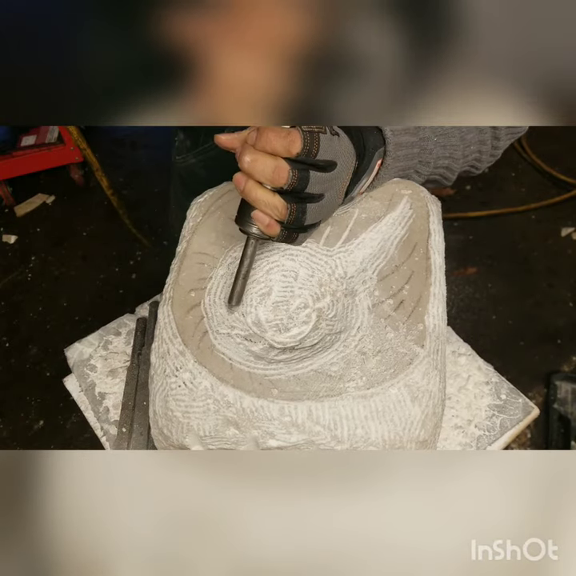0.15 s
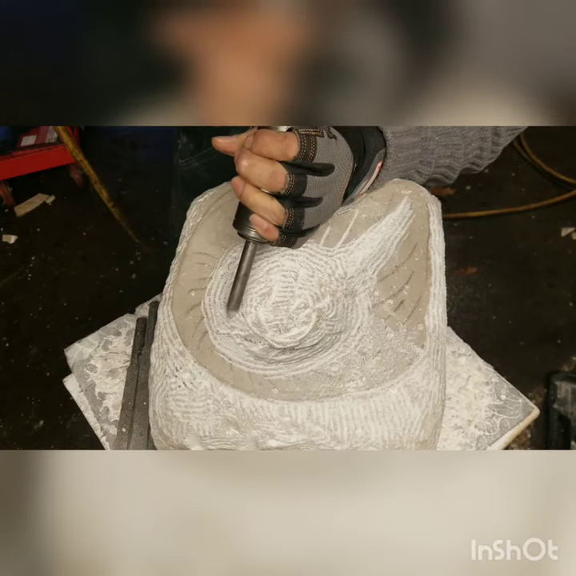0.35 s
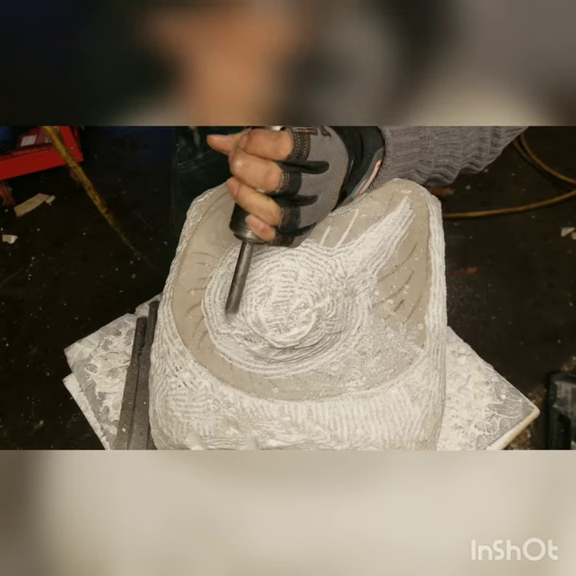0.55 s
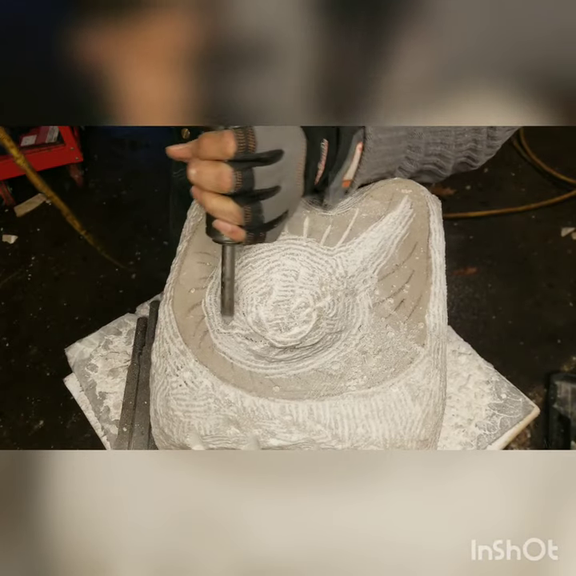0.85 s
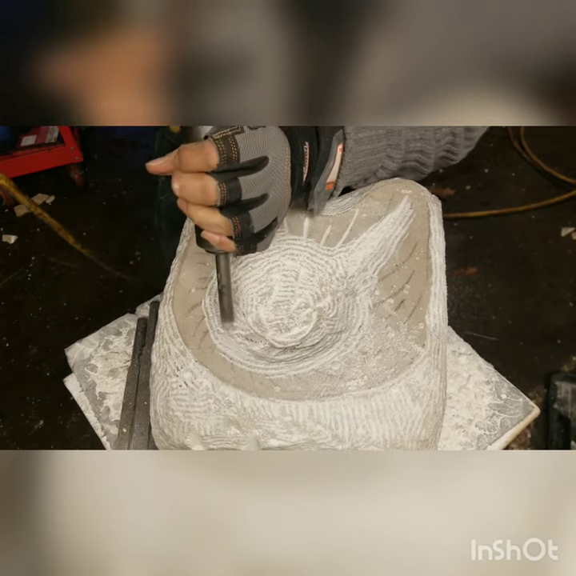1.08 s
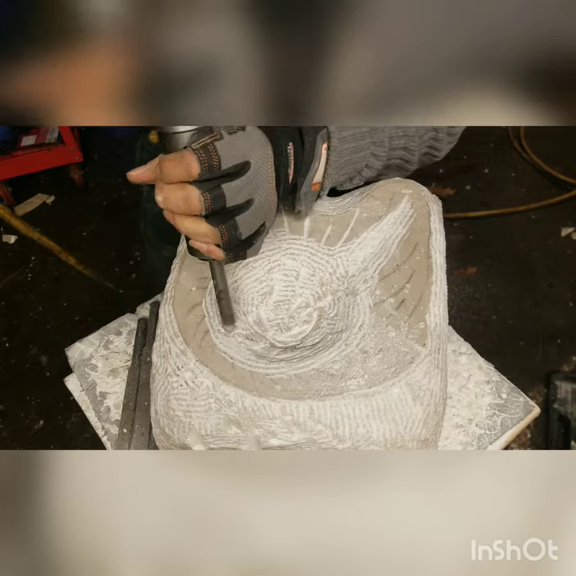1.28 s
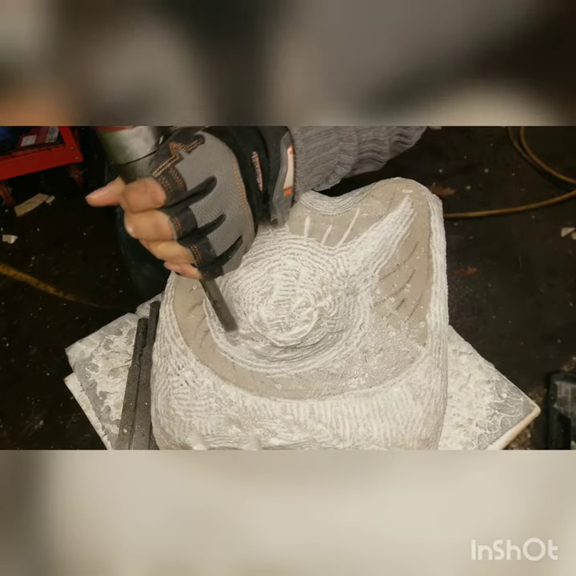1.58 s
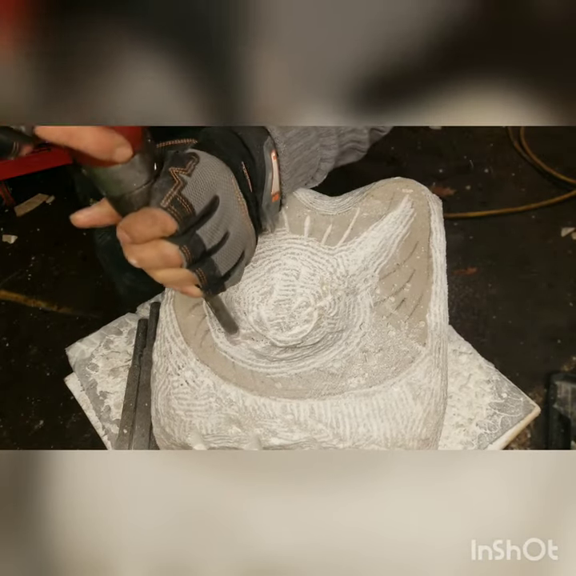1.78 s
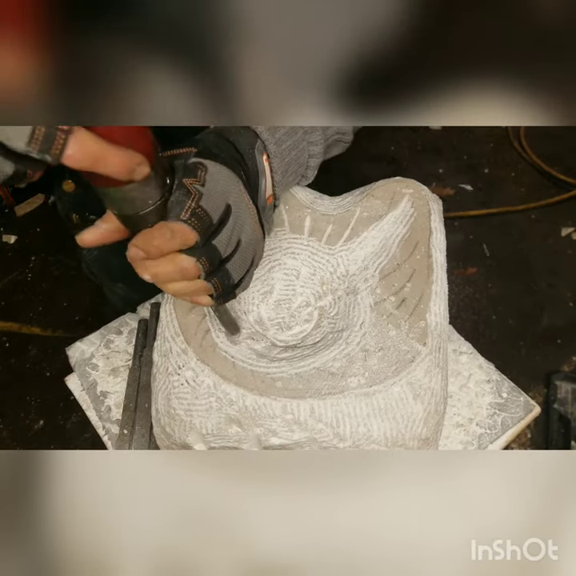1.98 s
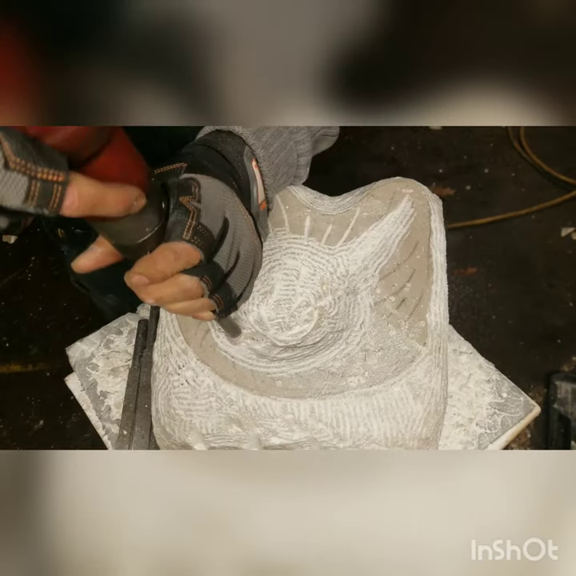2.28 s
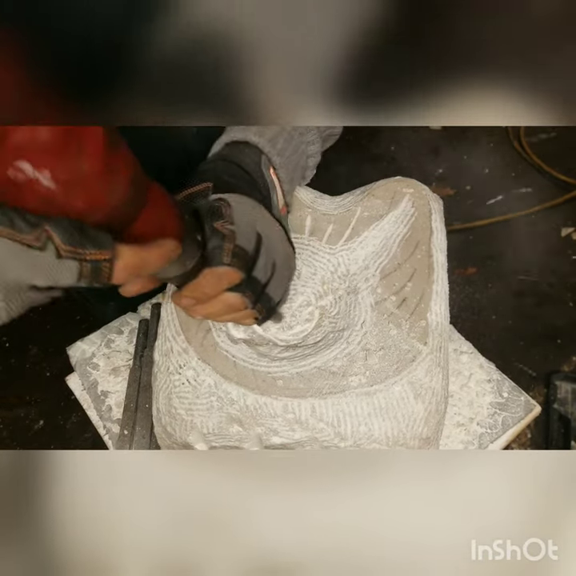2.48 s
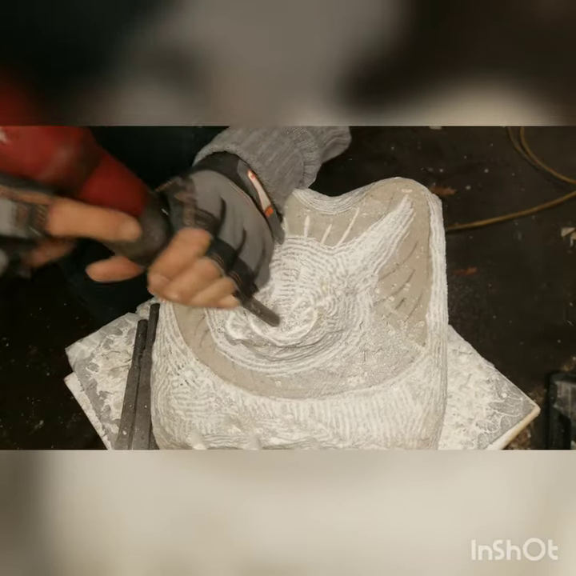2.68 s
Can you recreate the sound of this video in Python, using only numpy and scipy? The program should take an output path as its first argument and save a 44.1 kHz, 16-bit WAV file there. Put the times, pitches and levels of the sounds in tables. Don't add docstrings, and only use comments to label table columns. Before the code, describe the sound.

Pneumatic hammer chisels stone in rapid sharp metallic bursts with hissing air, close up

```python
import sys
import numpy as np
from scipy import signal
from scipy.fft import rfft, irfft, next_fast_len
from scipy.io import wavfile
from scipy.ndimage import uniform_filter1d, minimum_filter1d

SR = 44100
rng = np.random.default_rng(int(sys.argv[2]) if len(sys.argv) > 2 else 0)


def voltage_ratio(level):
    return 10 ** (np.asarray(level, float) / 20)


def inscribe(sig):
    pcm = np.round(np.clip(np.atleast_2d(sig).T, -1, 1) * 32767)
    wavfile.write(sys.argv[1], SR, pcm.astype(np.int16))


N = 125685


def unit(x):
    return x / np.sqrt(np.mean(x ** 2) + 1e-20)


def along(points, hz):
    f, v = np.transpose(points)
    return np.interp(np.log(hz + 1), np.log(f + 1), v)


def at(points, s):
    return np.interp(s, *np.transpose(points))


def filtered(x, response):
    m = next_fast_len(N + SR // 2)
    return irfft(rfft(x, m) * response(np.fft.rfftfreq(m, 1 / SR)), m)[..., :N]


def peak(f, hz, width, db):
    return voltage_ratio(db) * 1j * f * width / (hz * hz - f * f + 1j * f * width)


def dying(t, after, t60, rise):
    u = np.maximum(t - after, 0)
    return voltage_ratio(-60 * u / t60) * (1 - np.exp(-u / rise))


def noise(spectrum):
    z = signal.stft(rng.standard_normal((2, N)), nperseg=256)[2]
    field = rng.standard_normal(z.shape[1:])
    field = uniform_filter1d(uniform_filter1d(field, 8, 0), 8, 1)
    patch_db = 2.5 * unit(field)
    pair = signal.istft(z * voltage_ratio(patch_db), nperseg=256)[1][:, :N]
    return unit(filtered(pair, lambda f: voltage_ratio(along(spectrum, f))))


# start_s, crack_db, ring_hz, stone_db, puff_db
SHORT_BURSTS = [(.2015, -58, 12000, -73, -48), (0.2132, -31, 12200, -40, -42.5),
                (0.2354, -42, 11380, -67, -34.5), (0.2599, -15, 12220, -30, -35.5),
                (0.3018, -7, 13060, -28, -31), (0.3468, -12.5, 11220, -26.5, -31.5),
                (0.404, -19, 11530, -34.5, -40), (0.4748, -22, 11100, -38, -37.5),
                (0.5228, -6, 12070, -30.5, -33), (0.5696, -8.5, 10980, -29.5, -36),
                (0.6063, -12.5, 11730, -30, -32.5), (0.6485, -12.5, 11600, -33.5, -38),
                (0.6901, -14, 11100, -27.5, -33.5), (0.7344, -14.5, 11920, -32.5, -39),
                (0.768, -23, 12400, -38, -45.5), (0.881, -19.5, 11960, -50, -44.5)]
# start_s, crack_db, ring_hz, stone_db, puff_db
LONG_BURST = [(0.906, -12.5, 12100, -31.5, -31.5), (0.9459, -6, 11400, -32, -33),
              (0.983, -14, 11800, -28, -32.5), (1.0238, -13, 11700, -30, -34),
              (1.0653, -11, 11440, -31, -33.5), (1.1038, -11.5, 12180, -32, -31.5),
              (1.1398, -12, 11500, -29.5, -33.5), (1.18, -13, 10970, -26, -31.5),
              (1.2172, -16.5, 11370, -29, -33), (1.254, -9, 11100, -30, -31.5),
              (1.2893, -13, 11000, -30.5, -32), (1.3254, -15, 11050, -31.5, -33.5),
              (1.365, -12.5, 11280, -28, -32), (1.4007, -14, 11650, -29.5, -36.5),
              (1.4374, -10, 11480, -28.5, -32.5), (1.4798, -14.5, 10970, -29, -32),
              (1.5195, -9, 11210, -34.5, -34.5), (1.5594, -12, 10860, -27.5, -32.5),
              (1.5958, -13.5, 11040, -29.5, -31), (1.6315, -12, 12320, -30.5, -33),
              (1.6691, -17, 11540, -29.5, -33), (1.704, -10, 11700, -28.5, -32.5),
              (1.7456, -19, 12400, -27, -31.5), (1.7824, -17, 11440, -32, -31.5),
                (1.8186, -23, 11000, -33.5, -30.5), (1.8525, -22, 12600, -27, -30),
                (1.888, -18.5, 10960, -29.5, -31), (1.9217, -12.5, 12100, -28, -29.5),
                (1.9577, -29, 12100, -31.5, -30), (1.9923, -26, 10700, -31.5, -31),
                (2.0258, -15.5, 11100, -27.5, -28.5), (2.0601, -22, 10760, -33, -31.5),
                (2.096, -20, 10600, -33, -30.5), (2.131, -24, 11800, -32.5, -31),
                (2.1647, -24.5, 11000, -28, -29), (2.199, -19, 13100, -31.5, -32),
                (2.2326, -18.5, 12900, -30, -31), (2.2673, -18, 11200, -28.5, -31),
                (2.3017, -28, 12300, -28.5, -31), (2.335, -11.5, 11430, -25, -29),
                (2.3715, -6.5, 12240, -28, -35), (2.413, -13, 11700, -30.5, -33.5),
                (2.4564, -11, 13200, -28.5, -35.5), (2.4978, -11.5, 11860, -26.5, -32.5),
                (2.5392, -21, 11730, -30, -32)]


def strokes():
    return SHORT_BURSTS + LONG_BURST


# pitch_hz, level_db (per Hz)
HUM_COLOUR = [(25, 4), (80, 4), (357, -42), (430, -42), (1170, -28), (1400, -39), (4000, -36), (6000, -68)]


def hum():
    return voltage_ratio(-62.5) * noise(HUM_COLOUR)


# pitch_hz, t60_s
ROOM_DECAY = [(150, 0.35), (4000, 0.32), (15000, 0.26)]


def room(x):
    out, step, delay = np.zeros((2, N + 2 * SR)), SR // 5, 200
    for k in range(0, N, step):
        hz, t, z = signal.stft(rng.standard_normal((2, SR // 3)), SR, nperseg=256)
        decay = voltage_ratio(-60 * t / along(ROOM_DECAY, hz)[:, None])
        tail = signal.istft(z * decay, SR, nperseg=256)[1]
        tail = tail / np.linalg.norm(tail[0])
        wet = signal.fftconvolve(x[None, k:k + step], tail, axes=1)
        out[:, k + delay:][:, :wet.shape[1]] += wet
    return out[:, :N]


# start_s, peak_db, pitch_hz, width_hz
TICK_EVENTS = [
    (0.1135, -53.5, 3900, 1490),
    (2.7218, -46.5, 12200, 2540),
    (2.748, -51, 10750, 900),
    (2.7681, -34.5, 10800, 398),
]


def ticks():
    out, t = np.zeros((2, N)), np.arange(N) / SR
    for s, db, hz, width in TICK_EVENTS:
        burst = voltage_ratio(db) * dying(t, s, 0.01, 0.00063) * rng.standard_normal((2, N))
        narrow = np.sqrt(SR / 4 / width)
        out += filtered(burst, lambda f: voltage_ratio(1) + peak(f, hz, width, 0) * narrow)
    return out


# start_s, rise_s, hold_s, level_db
JET_FLOW = [
    (.182, 0.011, 0.004, -44),
    (.208, .01, 0.021, -43),
    (.25, 0.016, 0.062, -26.5),
    (.46, 0.021, 0.03, -32.5),
    (.52, 0.011, 0.21, -29),
    (.845, 0.03, 0.0047, -33),
    (.91, 0.052, 0.7, -34),
    (1.74, 0.027, 0.79, -31.5),
]
# pitch_hz, level_db (per Hz)
JET_COLOUR = [(2500, -19), (4000, -14.5), (6000, -6), (9900, -10.5), (10800, -2), (14200, -1.5),
              (15500, -0.5)]
# start_s, rise_s, hold_s, level_db
LEAK_FLOW = [
    (2.735, 0.035, 0.04, -52),
    (2.78, 0.039, 0.018, -50.5),
]
# pitch_hz, level_db (per Hz)
LEAK_COLOUR = [(120, -27), (300, -6.5), (1500, -6), (5000, 0.5), (9000, -7.5), (12500, -5), (16000, -10)]
# start_s, rise_s, hold_s, level_db
SEEP_FLOW = [
    (.116, .004, .05, -74),
]
# pitch_hz, level_db (per Hz)
SEEP_COLOUR = [(600, -45), (2200, -6), (2900, -17), (4000, 3), (6500, -16), (12700, -13), (16000, -10)]


def flow(rows):
    t, t60 = np.arange(N) / SR, 0.094
    total = np.zeros(N)
    for s, rise, hold, db in rows:
        fall_db = 60 * np.maximum(t - s - rise - hold, 0) / t60
        total += voltage_ratio(db - fall_db) * np.clip((t - s) / rise, 0, 1) ** 0.61
    return total


def air():
    shut, shut_s, shut_wide_s, shut_db = np.zeros(N), 0.0032, 0.0024, -14
    for s, crack_db, *_ in strokes():
        shut[round((s - shut_s) * SR)] = crack_db > -18.2
    bell = np.arange(-800, 801) / SR
    shut = signal.fftconvolve(shut, np.exp(-(bell / shut_wide_s) ** 2), 'same')
    flutter_db = 2 * unit(uniform_filter1d(rng.standard_normal(N), 300))
    jet = noise(JET_COLOUR) + 0.18 * noise(STONE_COLOUR)
    out = flow(JET_FLOW) * voltage_ratio(shut_db * shut) * jet
    out += flow(LEAK_FLOW) * noise(LEAK_COLOUR)
    out += flow(SEEP_FLOW) * noise(SEEP_COLOUR)
    return voltage_ratio(flutter_db) * out


# start_s, level_db, pitch_hz, t60_s
BLOCK_NOTES = [
    (.815, -48, 890, 0.045),
    (1.1045, -27.5, 1027, 0.03),
    (1.1805, -29, 652, 0.043),
    (1.181, -28, 2004, 0.026),
    (2.172, -33, 747, .05),
    (2.335, -29, 1505, 0.034),
    (2.4985, -26.5, 1007, 0.039),
    (2.499, -27.5, 6595, .08),
    (2.785, -58, 530, 0.13),
]


def knocks():
    t, notes = np.arange(N) / SR, np.zeros((2, N))
    for s, db, hz, t60 in BLOCK_NOTES:
        pair_hz = hz * np.array([[.97], [1.04]])
        notes += voltage_ratio(db) * dying(t, s, t60, 0.0018) * np.sin(2 * np.pi * pair_hz * (t - s))
    return np.array([notes[0] + notes[1], notes[0] - notes[1]])


# after_s, push_or_suck, level_db
VALVE_PUFFS = [
    (-.0017, 0.49, -0.5),
    (.0007, -0.89, 1.5),
    (.0029, 0.98, -5.5),
    (.0104, 1, -1),
    (.0162, 1, 1.5),
]
# pitch_hz, width_hz, level_db
PORT_MODES = [(54.8, 55, -11.5), (94, 44.5, 7), (162.6, 22, -3), (286, 100, -1.5), (328.5, 160, -3),
              (769.8, 130, 0.5)]
# time_s, level_db
ROOM_COUPLING = [(.2, 0), (.45, 3), (.75, 4), (1, 3), (1.4, 5), (1.8, 0.5), (2.15, -1), (2.3, 0),
                 (2.54, 6.5)]
# time_s, level_db
TOOL_WEIGHT = [(.2, 0.5), (.47, -11), (.53, 15), (.76, 12), (.9, -5), (1.4, -12), (2.2, 6), (2.55, -12)]


def exhaust():
    puff_s, last_return_db = 0.00088, -7.5
    pulses, blows, thumps = np.zeros((2, N)), np.zeros(N), np.zeros(N)
    times = [row[0] for row in strokes()]
    for (s, *_, db), gap in zip(strokes(), np.diff(times, append=N)):
        blows[round((s - .0017) * SR)] = voltage_ratio(db + at(ROOM_COUPLING, s))
        thumps[round((s - .001) * SR)] = voltage_ratio(db + at(TOOL_WEIGHT, s))
        jitter, scatter, side = rng.standard_normal((3, len(VALVE_PUFFS)))
        for i, (after, sign, level) in enumerate(VALVE_PUFFS):
            k = round((s + after + .00025 * jitter[i]) * SR)
            puff_db = db + level + 1.73 * scatter[i] + last_return_db * (i > 2 and gap > .055)
            pulses[:, k] += sign * voltage_ratio(puff_db) * np.array([1, side[i]])

    def port(f):
        return sum(peak(f, *mode) for mode in PORT_MODES) / (1 + (np.pi * f * puff_s) ** 2)

    def bench(f):
        return peak(f, 72.5, 70, -1.5) / (1 + (f / 200) ** 2)

    out = filtered(pulses, port)
    out += filtered(thumps, bench) * np.array([[1], [.6]])
    out += filtered(blows, lambda f: peak(f, 231, 5.8, 15.5)) * np.array([[1], [.3]])
    return voltage_ratio(41.5) * out


# after_s, level_db, t60_s
CONTACTS = [
    (0, -7.5, 0.0073),
    (.0008, 2.5, 0.01),
    (.004, -10.5, 0.045),
    (.013, -14, .06),
]
# pitch_hz, level_db (per Hz)
CRACK_COLOUR = [(3000, -113), (5500, -7.5), (9800, -6), (10900, -10), (14200, 0), (15500, -2)]
# pitch_hz, level_db (per Hz)
STONE_COLOUR = [(300, -9.5), (650, -1.5), (1700, -4.5), (4000, -4), (7000, -5), (11000, -10)]


def cracks():
    shape, t = np.zeros((2, N + SR)), np.arange(3072) / SR
    for s, crack_db, _, stone_db, _ in strokes():
        k = round((s - .001) * SR)
        scatter, delay = rng.standard_normal((2, len(CONTACTS)))
        for i, (after, level, t60) in enumerate(CONTACTS):
            hit_db = np.array([[crack_db], [stone_db + 23]])
            if i > 1:
                hit_db = hit_db * np.array([[.6], [.8]]) - 5
            if i != 1:
                hit_db = hit_db + 1.85 * scatter[i]
            envelope = dying(t, after * (1 + 0.24 * delay[i]), t60, 0.0012)
            shape[:, k:k + len(t)] += voltage_ratio(hit_db + level) * envelope
    grit = voltage_ratio(0.53 * unit(uniform_filter1d(rng.standard_normal((2, N)), 25)))
    steel = voltage_ratio(-3.5) * shape[0, :N] * unit(grit[0] * noise(CRACK_COLOUR))
    stone = voltage_ratio(-11.5) * shape[1, :N] * unit(grit[1] * noise(STONE_COLOUR))
    return steel + stone


# pitch_hz, level_db, t60_s
STEEL_MODES = [(4587, -21.5, 0.17), (11120, -9, 0.048), (6760, -30.5, 0.24)]
# time_s, level_db
GRIP_FREEDOM = [(.2, -8), (.9, -2), (1.15, 2), (1.5, -11), (1.8, -3), (2.1, 8), (2.35, -3.5), (2.55, -7)]


def chisel():
    ring_db, ring_t60, spread, scatter_db = 11.5, .011, .025, 3
    smear = .055
    ring, t = np.zeros((2, N + SR)), np.arange(3072) / SR
    for s, db, hz, *_ in strokes():
        k = round((s - .001) * SR)
        free_db = at(GRIP_FREEDOM, s)
        modes = []
        for f, level, t60 in STEEL_MODES:
            modes.append((f, level + free_db * (f < 8000) - .5 * (db + 15.5), t60))
        for j in range(3):
            modes.append((hz * (1 + spread * j * rng.standard_normal()), ring_db - 2 * j, ring_t60))
        f, level, t60 = np.transpose(modes)[:, :, None]
        scatter = rng.standard_normal((len(modes), 1))
        scatter[len(STEEL_MODES)] = 0
        steps = rng.standard_normal((2, len(modes), len(t) // 8))
        wander = np.repeat(np.cumsum(steps, axis=2), 8, axis=2) * smear * f / 1000
        phase = wander + rng.uniform(0, 2 * np.pi, (2, len(modes), 1))
        size = 2 * voltage_ratio(db + level + scatter_db * scatter) * dying(t, 0.0014, t60, 0.0053)
        ring[:, k:k + len(t)] += np.sum(size * np.sin(2 * np.pi * f * t + phase), axis=1)
    return voltage_ratio(-6.5) * ring[:, :N]


# pitch_hz, likeness (0 to 1)
MIC_LIKENESS = [(30, 0.55), (70, 0.96), (250, 0.81), (600, 0.48), (3000, 0.1), (8000, 1), (11300, 0.63),
                (14000, 0.13)]
# pitch_hz, level_db
MIC_TILT = [(40, 4), (200, 2), (700, 4.5), (3000, 2.5), (6500, 0.5), (11000, -2), (13500, 1)]


def placed(pair):
    lag_s, lag_hz = -0.00011, 5400
    sign = np.array([[1], [-1]])

    def blend(f):
        turn = np.arccos(np.clip(along(MIC_LIKENESS, f), 0, 1)) / 2
        return np.array([np.cos(turn), np.sin(turn)])

    def arrival(f):
        lag = lag_s * f / (1 + (f / lag_hz) ** 3.34)
        return voltage_ratio(sign * along(MIC_TILT, f) / 2) * np.exp(-1j * np.pi * sign * lag)

    mid, side = filtered(pair, blend)
    return filtered(mid + sign * side, arrival)


def scene():
    ring, low = chisel(), exhaust()
    high = cracks() + ticks() + knocks()
    wet = room(voltage_ratio(-5.5) * (high[0] + voltage_ratio(-4) * ring[0]) + voltage_ratio(-15) * low[0])
    return placed(high + ring + low + air() + wet + hum())


def starved(x):
    lost_share, scatter_db = .045, 3.5
    z = signal.stft(x, nperseg=256)[2]
    power = np.sum(np.abs(z) ** 2, axis=0) + 1e-16
    steps = power.shape[1] // 3
    cells = power[20:60, :3 * steps].reshape(10, 4, steps, 3).mean(axis=(1, 3))
    cells_db = 10 * np.log10(cells)
    ring = power[60:76, :3 * steps].reshape(16, steps, 3).mean(axis=(0, 2))
    ring_db = 10 * np.log10(ring)
    margin = cells_db - np.median(cells_db, axis=1)[:, None] + minimum_filter1d(-ring_db, size=5)
    margin = margin + scatter_db * rng.standard_normal(margin.shape)
    kept = margin > np.quantile(margin, lost_share)
    keep = np.ones(power.shape)
    keep[20:60, :3 * steps] = np.kron(kept, np.ones((4, 3)))
    return signal.istft(z * keep, nperseg=256)[1][:, :N]


def band_limit(x):
    return signal.sosfilt(signal.butter(12, 17130, fs=SR, output="sos"), x)


def record(dry):
    def band(f):
        return 1 / (1 + (f / 15850) ** 110) * f ** 4 / (f ** 4 + 42 ** 4)

    mix = starved(filtered(dry, band))
    return band_limit(mix)


dry = scene()
out = record(dry)
inscribe(out)
```